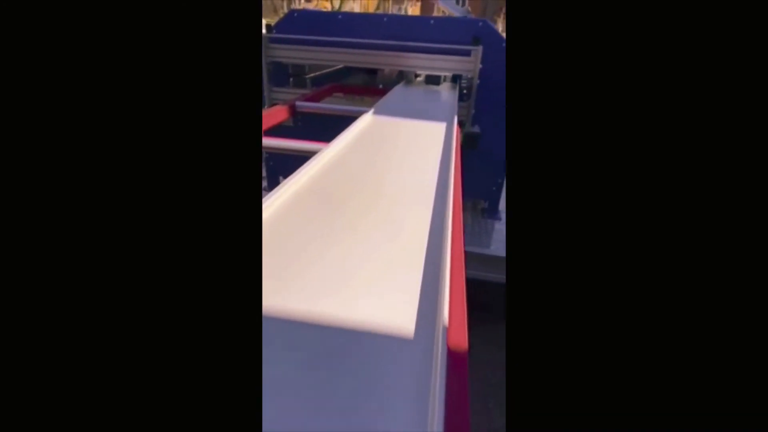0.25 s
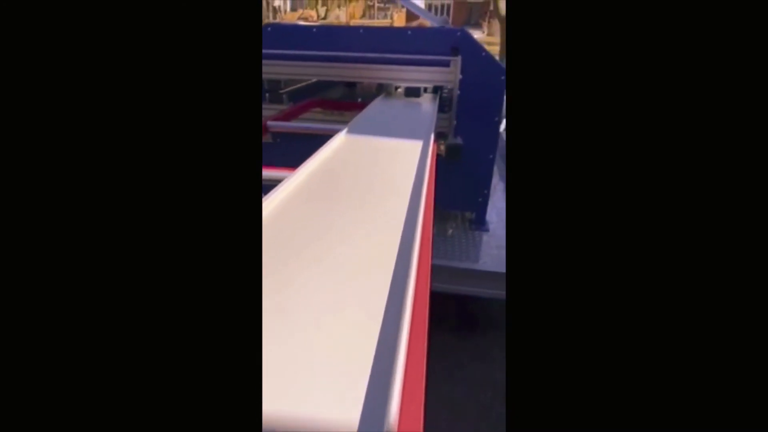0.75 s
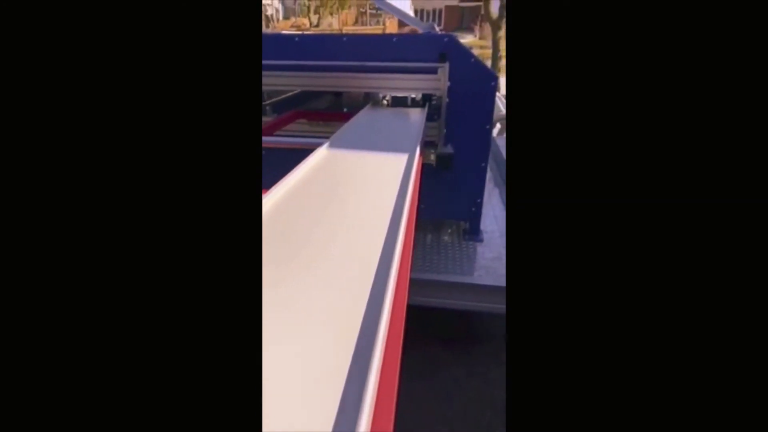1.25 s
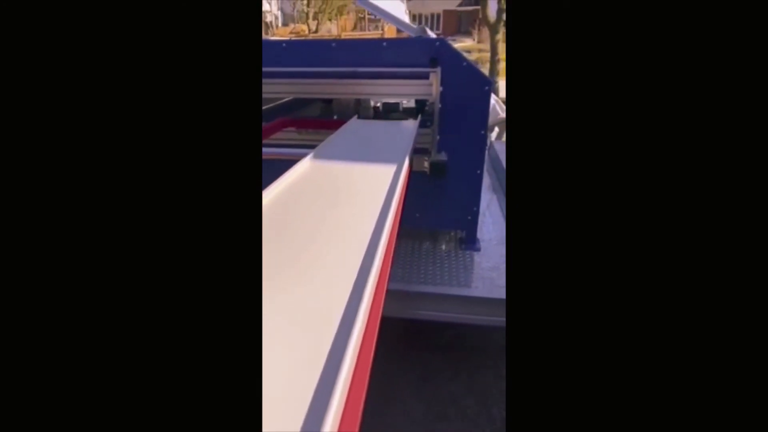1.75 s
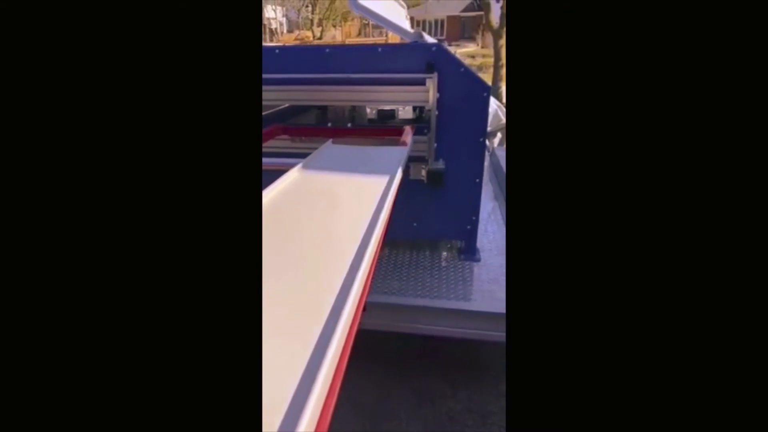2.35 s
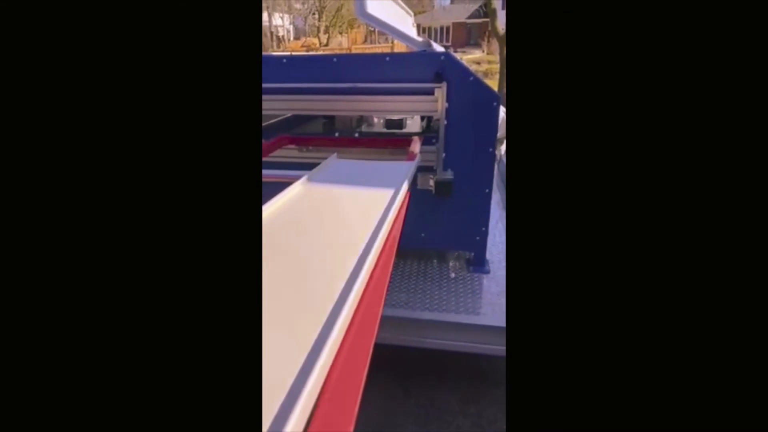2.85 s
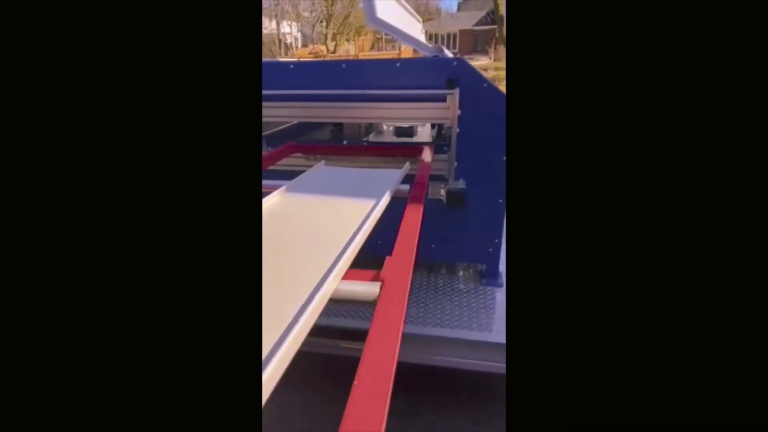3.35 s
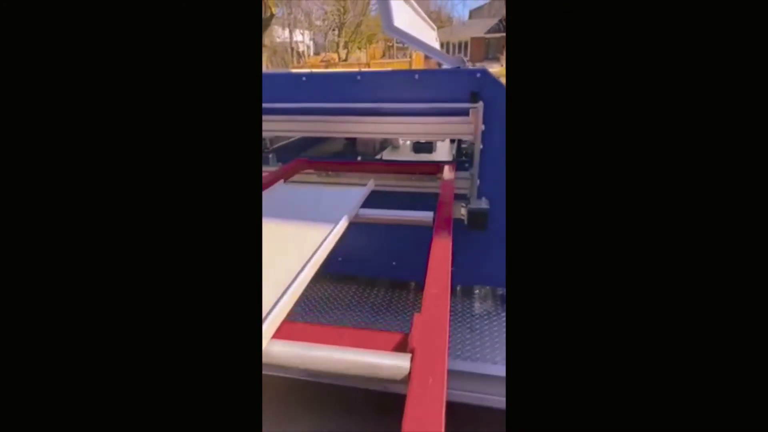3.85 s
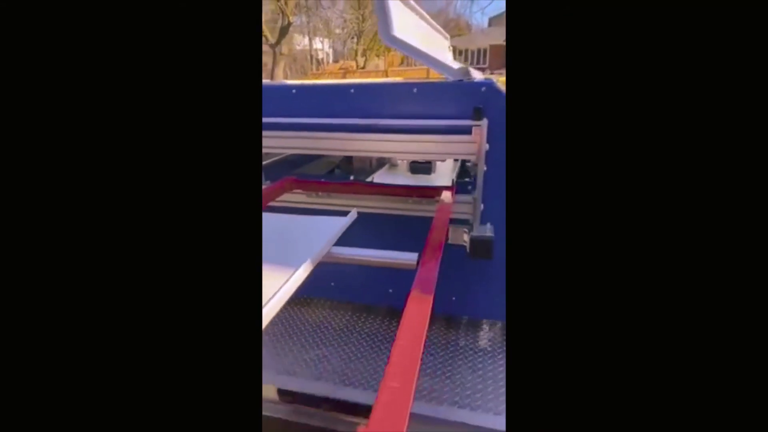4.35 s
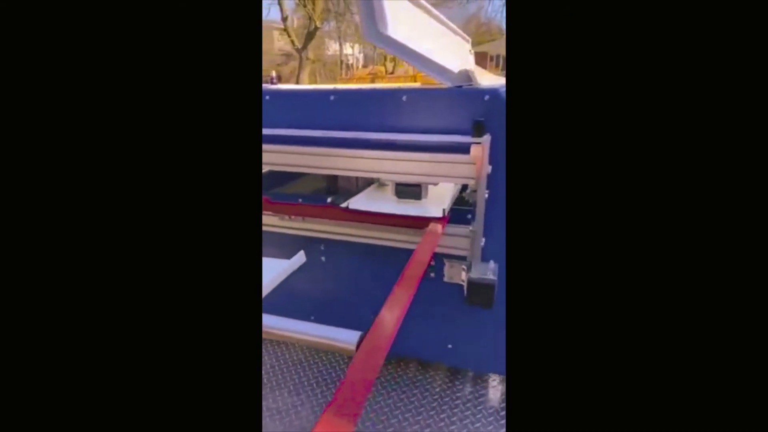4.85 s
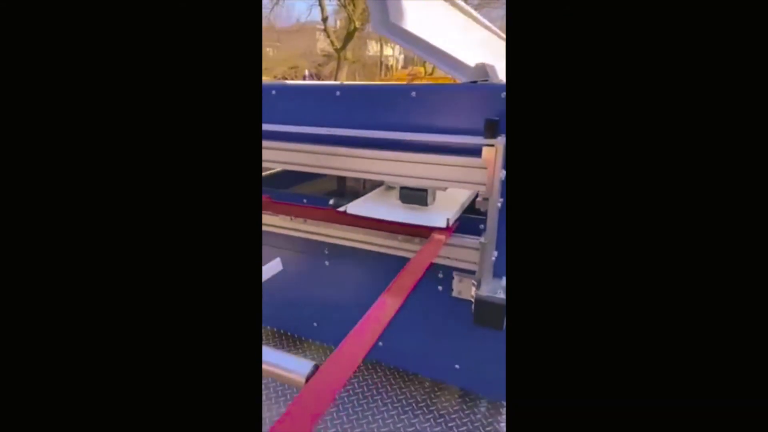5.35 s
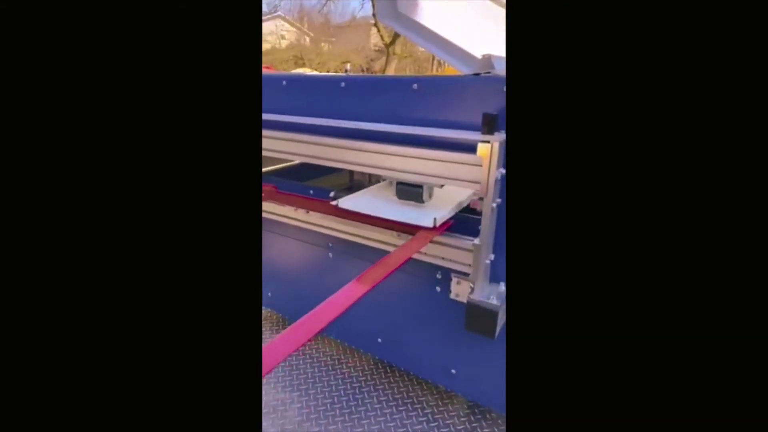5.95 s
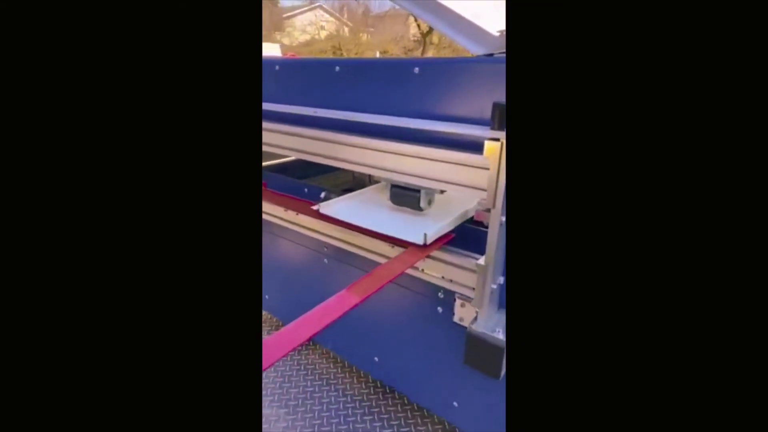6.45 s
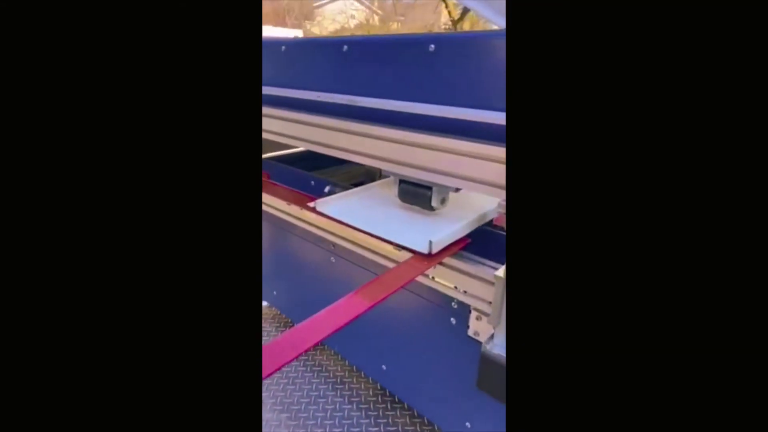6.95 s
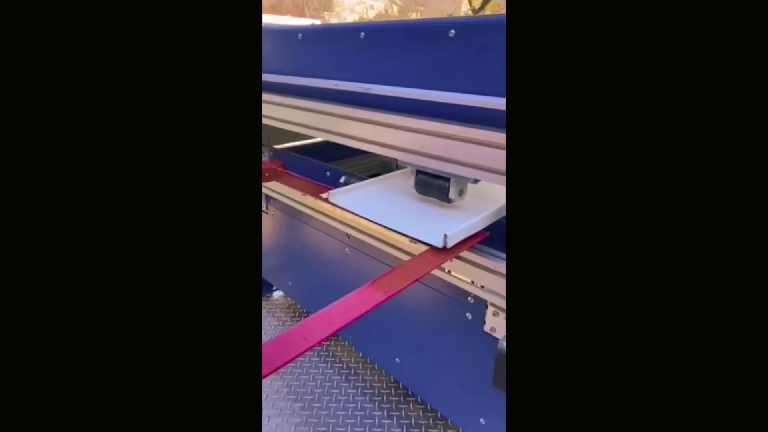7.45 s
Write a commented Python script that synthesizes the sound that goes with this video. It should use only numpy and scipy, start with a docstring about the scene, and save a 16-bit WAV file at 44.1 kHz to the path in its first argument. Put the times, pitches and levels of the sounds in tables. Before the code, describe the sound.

A thin steel roof panel leaves a forming machine outdoors, booming softly, rumbling and knocking over rollers while its edge scrapes and clanks on a rail. The drive's low hum stops after about three seconds. A sharp double snap, a dull bump and a few more clanks follow as the sheet drops away. Only light slides and taps remain over a faint outdoor rumble, heard from close by.

```python
"""Steel roof panel on a roller table

A thin sheet leaves a roll-forming machine outdoors, over the low hum of the drive. Flexure makes it
boom, rolling contact makes it rumble, and friction on the rail makes it scrape. Impacts excite
decaying modes: it knocks on the rollers and clanks on the frame as its end drops off them.
Then only a few light slides and taps are left over a faint outdoor rumble."""
import sys
import numpy as np
from scipy import signal
from scipy.fft import rfft, irfft, next_fast_len
from scipy.io import wavfile
from scipy.ndimage import map_coordinates

SR = 44100
rng = np.random.default_rng(int(sys.argv[2]) if len(sys.argv) > 2 else 0)


def transcribe(u):
    """Save the signal u as a 16-bit wav file named by the first command-line argument.

    u: samples, shape (n,) or (channels, n), limited to [-1, 1]; the rate is SR.
    q: integer samples, one column per channel.
    """
    v = np.clip(np.atleast_2d(u).T, -1, 1)
    q = np.round(v * 32767).astype(np.int16)
    wavfile.write(sys.argv[1], SR, q)


N = 339127
TIME = np.arange(N) / SR
BLOW_SAMPLES = SR // 2
CUTOFF_HZ = 16200
SHARED_ONLY = [[1], [0]]  # row 0: sound common to both microphone ports; row 1: diffuse sound


def from_db(db):
    """Amplitude ratio of a level in decibels."""
    return np.exp(np.asarray(db) * (np.log(10) / 20))


def unit_rms(x):
    """Normalisation to unit power."""
    return x / np.sqrt(np.mean(x ** 2) + 1e-20)


def gains(rows):
    """One amplitude envelope for each level column of a time table."""
    times, *columns = np.transpose(rows)
    return [from_db(np.interp(TIME, times, levels)) for levels in columns]


def at_hz(points, hz):
    """Interpolation on a logarithmic frequency axis."""
    known, values = np.transpose(points)
    return np.interp(np.log(np.maximum(hz, 1)), np.log(known), values)


def swell(start, end, attack, release):
    """Exponential growth and decay: full from start to end, 20 dB down one attack or release away."""
    before = np.maximum(start - TIME, 0) / attack
    after = np.maximum(TIME - end, 0) / release
    return from_db(-20 * (before + after))


def decay(t60):
    """Damped free vibration: the envelope falls 60 dB in t60 seconds."""
    return np.exp(-np.log(1000) * TIME[:BLOW_SAMPLES] / t60)


def drift(rate):
    """Random modulation of unit rms, with `rate` new values a second."""
    knots = rng.standard_normal(4096)
    return unit_rms(np.interp(TIME * rate, np.arange(len(knots)), knots))


def phase(hz):
    """Phase in radians, the time integral of frequency."""
    return 2 * np.pi * np.cumsum(hz) / SR


def noise(size=N):
    """Two uncorrelated white noises, shared and diffuse."""
    return rng.standard_normal((2, size))


def contacts(per_s, spread_db):
    """Shot noise: tiny contacts of uneven strength at random moments."""
    sizes = from_db(spread_db * np.minimum(rng.exponential(1, N), 5))
    return unit_rms(noise() * sizes * (rng.random(N) < per_s / SR))


def colour(x, spectrum, modes=()):
    """Source-filter model: x shaped by a broad spectrum and Lorentzian resonances, at unit rms."""
    size = next_fast_len(x.shape[-1])
    hz = np.fft.rfftfreq(size, 1 / SR)
    peaks = 1 + sum((from_db(db) ** 2 - 1) / (1 + (2 * (hz - f) / width) ** 2) for f, width, db in modes)
    gain = from_db(at_hz(spectrum, hz)) * np.sqrt(np.abs(peaks))
    return unit_rms(irfft(rfft(x, size) * gain, size)[..., :x.shape[-1]])


def partials(pitches, levels_db=0):
    """Superposition of sinusoids in random phase, at unit rms."""
    cycles = np.outer(pitches, TIME[:BLOW_SAMPLES]) + rng.random((len(pitches), 1))
    return unit_rms((from_db(levels_db) * np.sin(2 * np.pi * cycles).T).sum(1)) * SHARED_ONLY


def struck(modes, spread_db=3.5):
    """Modal excitation: each blow shares its force differently among the modes."""
    hz, _, db = np.transpose(modes)
    return partials(hz, db + spread_db * rng.standard_normal(len(hz)))


def add(out, t, sound):
    """Superpose a sound on `out` from time t."""
    at = max(round(t * SR), 0)
    out[:, at:at + sound.shape[1]] += sound[:, :N - at]


def sheet_ring(x, t60, ring_db, block=6000):
    """Plate reverberation: contacts ring on in dense modes, which change as the sheet travels."""
    ringing = np.zeros((2, N))
    for at in range(0, N, block):
        response = noise(2 * block) * decay(t60)[:2 * block]
        add(ringing, at / SR, signal.fftconvolve(x[:, at:at + block], response, axes=1))
    return x + from_db(ring_db) * unit_rms(ringing)


def bend(x, depth, rate):
    """Frequency modulation: all resonances drift by the fraction `depth` as the sheet bends."""
    at = np.arange(N) + np.cumsum(depth * drift(rate))
    return np.array([map_coordinates(row, [at], order=3, mode="reflect") for row in x])


# spectrum of the outdoor rumble: f/Hz, gain/dB
AIR_SPECTRUM = [(20, -19.5), (35, -7), (48, 0), (90, 3), (130, -5), (180, -11.5), (260, -13.5), (500, -21),
                (1000, -28), (2000, -33.5), (5000, -39), (10000, -44.5), (13000, -48), (16000, -54)]
# faint hum within it: f/Hz, bandwidth/Hz, gain/dB
AIR_PEAK = [(617, 14, 8.5)]


def outdoors():
    """Ambient noise: a fluctuating low rumble with a thin hiss above it."""
    return from_db(-50) * colour(noise(), AIR_SPECTRUM, AIR_PEAK) * from_db(drift(36))


# swells of a distant drone: t/s, level/dB
DRONE_SWELLS = [(4.649, -52), (7.15, -57)]


def drone(first_swell_hz=191.4, sag_hz_per_s=8.7, fade_s=1.1):
    """A modulated tone: it wavers in level and frequency while its pitch slowly sinks."""
    hz = first_swell_hz - sag_hz_per_s * (TIME - DRONE_SWELLS[0][0])
    envelope = sum(from_db(db) * swell(t, t, fade_s, fade_s) for t, db in DRONE_SWELLS)
    tone = np.sin(phase(hz * (1 + 0.024 * drift(30))))
    return np.sqrt(2) * envelope * from_db(1.8 * drift(13)) * tone * SHARED_ONLY


IDLER_START_S = 2.96


def whine():
    """Narrow-band noise: a thin, very high whine while the idler roller spins."""
    band = colour(noise(), [(14800, -40), (15500, 0), (15850, 0), (16200, -40)], [(15680, 260, 10)])
    return from_db(-56.5) * band * swell(IDLER_START_S, 4.16, attack=0.18, release=0.18)


def idler(hz=47.3):
    """Rotational tone: an idler roller spins freely with a deep drone, then stops."""
    envelope = from_db(-44) * swell(IDLER_START_S, 4.4, attack=0.5, release=0.24)
    return np.sqrt(2) * envelope * np.sin(phase(hz * (1 + 0.022 * drift(2.7)))) * SHARED_ONLY


# drive hum: t/s, then level/dB of harmonics 1, 2 and 5
HUM_HARMONICS = [(0.4, -50, -36, -35.5), (0.5, -33.5, -29, -37), (0.76, -28.5, -38, -37),
                 (0.93, -31.5, -29.5, -43), (1.1, -31, -32, -51), (1.44, -38, -25.5, -29),
                 (1.62, -32.5, -33, -48), (1.98, -32.5, -43, -42), (2.2, -48, -58, -34.5),
                 (2.39, -57, -32, -71), (2.49, -30, -38.5, -45), (3.05, -32, -35, -51.5)]


def drive_hum(hz=73.94, waver=0.005):
    """Periodic vibration: the drive sounds three harmonics of a slightly unsteady fundamental."""
    first, second, fifth = gains(HUM_HARMONICS)
    angle = phase(hz * (1 + waver * drift(8)))
    tone = first * np.sin(angle) + second * np.sin(2 * angle) + fifth * np.sin(5 * angle)
    return np.sqrt(2) * tone * swell(0.42, 2.97, attack=0.19, release=0.24) * SHARED_ONLY


# touches of loose metal: t/s, relative level/dB, f/Hz, T60/s
LIGHT_TAPS = [(4.771, -52.5, 1490, 0.24), (5.533, -46, 3300, 0.19), (5.546, -51, 2920, 0.23),
              (5.858, -57, 1100, 0.18), (5.879, -49.5, 2100, 0.23), (5.956, -46.5, 2510, 0.33),
              (6.710, -52.5, 2400, 0.14), (6.798, -57, 1505, .12), (7.050, -57, 9650, .12),
              (7.109, -55.5, 1520, .18), (7.338, -53, 10420, .11), (7.49, -47, 1820, 0.1),
              (7.494, -50, 3180, .07)]
# spectrum of a tap: f/Hz, gain/dB
TAP_SPECTRUM = [(400, -14), (1600, 1), (4500, -5.5), (11000, -10), (16000, -26)]


def taps(level_db=-5, relative_width=0.26, overtone_ratio=1.6, tick_t60=0.026, rise_s=0.0087):
    """Light impacts: a soft tick, then the damped ring of one broad resonance and two partials."""
    out = np.zeros((2, N))
    for t, db, hz, t60 in LIGHT_TAPS:
        resonance = colour(noise(BLOW_SAMPLES), TAP_SPECTRUM, [(hz, relative_width * hz, 11)])
        ring = from_db(-10) * partials([hz, min(hz * overtone_ratio, CUTOFF_HZ)])
        envelope = (decay(t60) + decay(tick_t60)) * (1 - decay(rise_s))
        add(out, t, from_db(db + level_db) * (resonance + ring) * envelope)
    return out


# late slides: start/s, end/s, attack/s, release/s, relative level/dB, resonant share of power (0-1)
LIGHT_SLIDES = [(5.188, 5.257, 0.049, 0.19, -50.5, 0.06), (5.37, 5.397, 0.11, 0.52, -59.5, 0.16),
                (5.985, 6.064, 0.06, 0.17, -56, 0.84), (6.104, 6.207, 0.044, 0.15, -46.5, 0.55),
                (6.212, 6.218, 0.082, 0.045, -43, 0.96), (7.45, 7.47, 0.06, 0.2, -64, 0.13)]
# spectrum of sliding: f/Hz, gain/dB
SLIDE_SPECTRUM = [(150, -4), (350, 1), (800, 3.5), (1500, -2), (2400, 1.5), (4600, -1.5), (6000, -2.5),
                  (10000, -6.5), (13000, -8), (16000, -26)]
# modes excited by firm sliding: f/Hz, bandwidth/Hz, gain/dB
SLIDE_RESONANCES = [(985, 67, 10), (1277, 21, 13), (1993, 39, 10), (2910, 44, 23.5), (3020, 100, 7),
                    (3530, 30, 12), (4000, 45, 16.5), (4120, 72, 16.5), (4435, 46, 17), (4980, 120, 11),
                    (5430, 60, 12)]


def slides(level_db=1):
    """Sliding friction: light rubbing is a plain hiss; firmer rubbing excites the sheet's modes."""
    friction = sheet_ring(contacts(per_s=1500, spread_db=2.5), t60=0.13, ring_db=6)
    friction *= from_db(0.97 * drift(70))
    singing = bend(colour(friction, SLIDE_SPECTRUM, SLIDE_RESONANCES), depth=0.004, rate=30)
    hiss = colour(friction, SLIDE_SPECTRUM)
    out = np.zeros((2, N))
    for start, end, attack, release, db, share in LIGHT_SLIDES:
        blend = np.sqrt(share) * singing + np.sqrt(1 - share) * hiss
        out += from_db(db + level_db) * swell(start, end, attack, release) * blend
    return out


# the sheet flexes or settles: t/s, relative level/dB, T60/s
DULL_BUMPS = [(3.385, -24.5, 0.96), (4.45, -39, 0.46), (5.831, -50, 0.46), (6.104, -36, 0.11),
              (7.455, -46, 0.14)]
# spectrum of a bump: f/Hz, gain/dB
BUMP_SPECTRUM = [(120, -11.5), (240, -7.5), (360, -3), (600, -11.5), (1000, -18), (2500, -56)]


def bumps(level_db=-3, rise_s=0.19):
    """Soft impacts: a slow contact excites only the low modes of the sheet."""
    out = np.zeros((2, N))
    for t, db, t60 in DULL_BUMPS:
        thud = colour(noise(BLOW_SAMPLES), BUMP_SPECTRUM)
        add(out, t, from_db(db + level_db) * thud * decay(t60) * (1 - decay(rise_s)))
    return out


# the edge bites harder: start/s, end/s, level/dB, resonance f/Hz
EDGE_BITES = [(2.036, 2.182, -33, 5100), (3.307, 3.407, -38, 4640), (3.537, 3.658, -42, 5200)]
# spectrum of a rasp: f/Hz, gain/dB
RASP_SPECTRUM = [(2500, -38), (4000, 0), (4600, -7), (5000, -4), (5400, -1.5), (6300, -6), (8000, -22)]


def rasps(width_hz=190, resonance_db=7.5):
    """Coarse friction: each bite of the edge excites one resonance of the rail."""
    teeth = sheet_ring(contacts(per_s=4000, spread_db=7), t60=0.36, ring_db=9.5)
    out = np.zeros((2, N))
    for start, end, db, hz in EDGE_BITES:
        rasp = colour(teeth, RASP_SPECTRUM, [(hz, width_hz, resonance_db)])
        out += from_db(db) * swell(start, end, attack=0.068, release=0.11) * rasp
    return out


# low modes that sing out: start/s, end/s, level/dB, f/Hz
SINGING_MODES = [(0.0, 0.041, -25.5, 584.4), (0.031, 0.164, -28, 645), (0.965, 1.11, -29.5, 212),
                 (1.885, 1.97, -27.5, 92), (1.92, 2, -32.5, 439), (2.14, 2.193, -32, 633),
                 (2.163, 2.295, -29.5, 100.6)]


def groans(fade_s=0.089, waver=0.0118):
    """Friction-driven resonance: single low modes of the dragged sheet build up and sing briefly."""
    angle_per_hz = phase(1 + waver * drift(26))
    tones = sum(from_db(db) * swell(start, end, fade_s, fade_s) * np.sin(hz * angle_per_hz)
                for start, end, db, hz in SINGING_MODES)
    return np.sqrt(2) * tones * SHARED_ONLY


# snaps of the edge: t/s, level/dB, standard deviation of the pulse/s
EDGE_SNAPS = [(3.1843, -12.5, 0.00084), (3.216, -17, 0.0011), (3.221, -27.5, 0.0013)]


def snaps(tail_db=-23, tail_t60=0.28):
    """Impulsive transients: a Gaussian pulse of very bright noise with a short, weak ring."""
    spectrum = [(2000, -20), (5800, -5), (8000, 8), (12000, -9.5), (16000, 2)]
    out = np.zeros((2, N))
    for t, db, width in EDGE_SNAPS:
        crack = colour(noise(BLOW_SAMPLES), spectrum)
        pulse = np.exp(-((TIME[:BLOW_SAMPLES] / width - 2) ** 2) / 2)
        add(out, t - 2 * width, from_db(db) * crack * (pulse + from_db(tail_db) * decay(tail_t60)))
    return out


# edge hits frame: t/s, relative level/dB, gain above 8 kHz/dB, mode cluster f/Hz, cluster gain/dB
FRAME_HITS = [(0.033, -17, -4, 5660, 10.5), (0.1466, -29, 4, 4500, 0), (0.2768, -23, -2, 4500, -4),
              (0.4278, -28, 0, 3200, -5), (0.503, -31, -1, 3140, 13), (0.7918, -28, 6, 5000, 2),
              (0.889, -33, -4, 5300, 0), (0.973, -36.5, 7, 5200, 6), (1.133, -26, -3, 4000, 8),
              (1.154, -25.5, 18, 5000, -3), (1.18, -28, -14, 4200, 16.5), (1.3218, -24, 1, 3200, -1),
              (1.386, -42, 1, 2400, 4), (2.2324, -15.5, -5, 5100, -1), (2.306, -23, -0.5, 4600, 4),
              (2.7627, -27.5, 4, 5000, -3), (3.844, -22, 6.5, 5100, 1.5), (4.156, -10.5, 0, 5180, 5.5),
              (4.5894, -23.5, 1.5, 2370, 3)]
# spectrum of a clank: f/Hz, gain/dB
CLANK_SPECTRUM = [(300, -23), (800, -4.5), (1600, -8.5), (2300, -1), (4500, 2), (6500, 3), (9000, -2.5),
                  (12500, -5.5), (15600, -11.5), (16500, -29.5)]
# high modes of the struck edge: f/Hz, bandwidth/Hz, gain/dB
EDGE_MODES = [(2097, 47, 3.5), (3105, 35, 6.5), (3920, 36, 2), (4440, 40, 6.5), (4555, 29, 4.5),
              (4750, 55, 4), (4900, 25, 5.5), (5185, 45, 3.5), (5420, 50, 5.5), (5680, 35, 4),
              (5970, 50, 3.5)]


def clanks(level_db=-6, rise_s=0.014, cluster_width_hz=300):
    """Hard impacts excite all the high modes at once; the point of contact weights one cluster."""
    strike = from_db(-0.5) * decay(t60=0.027)
    shimmer = from_db(-19) * decay(t60=0.47)
    envelope = strike + decay(t60=0.22) + shimmer
    out = np.zeros((2, N))
    for t, db, treble_db, cluster_hz, cluster_db in FRAME_HITS:
        spectrum = [(hz, gain + treble_db * (hz > 8000)) for hz, gain in CLANK_SPECTRUM]
        modes = EDGE_MODES + [(cluster_hz, cluster_width_hz, cluster_db)]
        crash = colour(noise(BLOW_SAMPLES), spectrum, modes) * envelope
        ring = from_db(-4) * struck(EDGE_MODES) * decay(t60=0.2)
        add(out, t, from_db(db + level_db) * (crash + ring) * (1 - decay(rise_s)))
    return out


# sheet hits roller: t/s, relative level/dB, f/Hz, bandwidth/Hz, low-mode gain/dB, overtone gain/dB
ROLLER_HITS = [(0.005, -10.5, 1240, 200, -14, -20.5), (0.026, -16, 628, 109, -7, -19.5),
               (0.077, -12, 1270, 120, -13, -20), (0.150, -15.5, 1276, 110, -2, -20),
               (0.429, -19, 613, 150, -16.5, -15), (0.801, -14.5, 990, 300, -16, -13),
               (1.324, -16.5, 710, 90, -11, -13), (1.386, -16, 616, 120, -9, -25),
               (1.774, -14, 965, 260, -11.5, -22.5), (2.308, -12, 722, 110, -17, -14.5),
               (2.772, -12, 1007, 330, -8, -16), (3.844, -31, 863, 80, -7.5, -13),
               (4.16, -25.5, 855, 100, -2.5, -14.5), (4.591, -17, 803, 95, -7, -10),
               (6.119, -46, 704, 400, -19, -12)]
# spectrum of a knock: f/Hz, gain/dB
KNOCK_SPECTRUM = [(300, -2), (600, -2.5), (750, 5.5), (1080, -1), (1400, -4.5), (2000, -12.5),
                  (3500, -19.5), (6000, -22.5), (12000, -44)]
# overtones of a hollow roller: f/Hz, bandwidth/Hz, gain/dB
ROLLER_OVERTONES = [(2330, 73, 18.5), (2520, 90, 18.5), (2840, 24, 18), (3155, 36, 15), (3960, 36, 20.5),
                    (4340, 44, 17.5), (4530, 36, 18), (4690, 70, 19.5), (5700, 50, 16.5), (6312, 50, 21)]


def knocks(level_db=-7, resonance_db=13, rise_s=0.0099):
    """Blunt impacts ring a roller; the point of contact selects three close low modes."""
    out = np.zeros((2, N))
    for t, db, hz, width_hz, low_db, overtone_db in ROLLER_HITS:
        modes = [(hz, width_hz, resonance_db)] + ROLLER_OVERTONES
        crack = colour(noise(BLOW_SAMPLES), KNOCK_SPECTRUM, modes)
        crack *= from_db([[1], [-4]])  # a near, small source: more shared than diffuse sound
        low_ring = from_db(low_db) * partials([0.91 * hz, hz, 1.06 * hz])
        overtones = from_db(overtone_db) * struck(ROLLER_OVERTONES)
        knock = crack * decay(t60=0.21) + (low_ring + overtones) * decay(t60=0.22)
        add(out, t, from_db(db + level_db) * knock * (1 - decay(rise_s)))
    return out


# the panel travels off over the rollers: t/s, relative level/dB of boom and of rolling
PANEL_TRAVEL = [(0.0, -24.5, -22), (0.13, -25, -33), (0.3, -37.5, -37), (0.48, -31.5, -32),
                (0.8, -31.5, -32.5), (1.35, -23.5, -27), (1.62, -29, -34.5), (2.75, -26.5, -33),
                (3.02, -35, -47.5), (4.15, -35, -48), (4.72, -42, -54.5), (5.0, -43.5, -56.5)]
# edge presses on rail: start/s, end/s, attack/s, release/s, relative level/dB of roll, scrape, sizzle
RAIL_RUBS = [(0.0, 0.048, 0.061, 0.47, -19.5, -25, -25.5), (0.462, 0.533, 0.23, 0.13, -35, -41.5, -67),
             (1.075, 1.195, 0.16, 0.16, -29, -35, -44), (1.772, 1.81, 0.28, 0.82, -25, -33.5, -34.5),
             (1.96, 2.15, 0.34, 0.45, -29.5, -33.5, -33.5), (2.604, 2.678, 0.1, 0.12, -33, -51, -60),
             (2.75, 3.02, 0.8, 0.48, -52, -41.5, -44.5), (3.318, 3.452, 0.26, 0.32, -43, -39, -35),
             (3.517, 3.619, 0.36, 0.27, -51.5, -45.5, -40.5)]
# spectra of flexure, rolling, scraping and the sizzle of the edge: f/Hz, gain/dB
BOOM_SPECTRUM = [(20, -22.5), (36, -19.5), (55, -7), (75, 3.5), (100, -1), (135, 4), (180, -11), (260, -8),
                 (500, -52)]
ROLL_SPECTRUM = [(110, -13), (210, 1), (300, 1.5), (450, -4), (750, -5), (1100, -11), (1450, -15),
                 (2200, -16.5), (5000, -48)]
SCRAPE_SPECTRUM = [(600, -16.5), (1400, 5), (2000, 5), (3200, 5.5), (5200, 3), (6500, -3.5), (8000, -15.5),
                   (11000, -21), (16000, -39)]
SIZZLE_SPECTRUM = [(4000, -28.5), (6500, 5.5), (8300, 5), (10500, 3.5), (13000, 2), (14800, -9.5),
                   (15600, -5.5), (16300, -34)]
# modes of the sheet, rolling and scraping: f/Hz, bandwidth/Hz, gain/dB
ROLL_RESONANCES = [(202.5, 20, 4), (372.5, 21, 5), (446, 10, 8), (546.5, 48, 6.5), (620, 19, 8.5),
                   (845, 54, 6.5), (1048, 50, 7), (1230, 64, 10), (1600, 76, 8.5)]
SCRAPE_RESONANCES = [(2050, 120, 3), (2930, 170, 2.5), (4540, 200, 0.64), (5000, 39, 4.6), (5440, 120, 1.2)]


def panel(sizzle_exponent=2.13, end_s=5.52):
    """Forced vibration of a thin plate: it booms in flexure, rattles on rollers, scrapes on the rail."""
    boom, roll = gains(PANEL_TRAVEL)
    scrape, sizzle = from_db(-15.5) * roll, from_db(-24.5) * roll  # the edge always brushes the rail
    for start, end, attack, release, roll_db, scrape_db, sizzle_db in RAIL_RUBS:
        pressure = swell(start, end, attack, release)
        roll = np.hypot(roll, from_db(roll_db) * pressure)  # incoherent sounds add in power
        scrape = np.hypot(scrape, from_db(scrape_db) * pressure)
        sizzle = np.hypot(sizzle, from_db(sizzle_db) * pressure ** sizzle_exponent)
    flexing = from_db(-1) * boom * colour(noise(), BOOM_SPECTRUM)
    rattle = contacts(per_s=4200, spread_db=0.5) * from_db(drift(35))
    rolling = from_db(2) * roll * colour(rattle, ROLL_SPECTRUM, ROLL_RESONANCES)
    friction = sheet_ring(contacts(per_s=3500, spread_db=0.5), t60=0.086, ring_db=2)
    friction *= from_db(1.9 * drift(30))
    scraping = from_db(3) * scrape * colour(friction, SCRAPE_SPECTRUM, SCRAPE_RESONANCES)
    sizzling = from_db(0.5) * sizzle * colour(friction, SIZZLE_SPECTRUM) * from_db(1.9 * drift(24))
    fade_out = np.clip(end_s - TIME, 0, 1)
    return (flexing + rolling + scraping + sizzling) * fade_out


# likeness of the two microphone ports: f/Hz, coherence (0-1)
PORT_COHERENCE = [(80, 1), (220, 0.94), (400, 0.72), (700, 0.43), (2500, 0.42), (6000, 0.69), (7200, 1),
                  (7800, 0.96), (9000, 0.54), (10300, 0.86), (11100, 0.66), (12200, 0.84), (13400, 1),
                  (15200, .55)]
# lead of the left port: f/Hz, phase/rad
PORT_LEAD = [(100, 0), (600, -.15), (1800, .05), (2700, 1.2), (5500, 1.1), (6900, 3.05), (7800, 3.25),
             (9800, 6.2), (11200, 6.35), (13000, 9.35), (14300, 9.5), (15200, 12.4)]


def ports(x):
    """Spatial coherence: two close ports hear the bass alike; higher up, likeness and phase part."""
    size = next_fast_len(N + SR // 10)
    hz = np.fft.rfftfreq(size, 1 / SR)
    shared, diffuse = rfft(x, size)
    coherence = np.clip(at_hz(PORT_COHERENCE, hz), 0, 0.995)
    shared *= np.sqrt((1 + coherence) / 2)
    diffuse *= np.sqrt((1 - coherence) / 2)
    lean_db = at_hz([(60, -1.2), (150, 0.6), (300, 1.5), (600, -0.32), (4000, 0.67)], hz)
    skew = from_db(lean_db / 2) * np.exp(1j * at_hz(PORT_LEAD, hz) / 2)
    left, right = (shared + diffuse) * skew, (shared - diffuse) / skew
    return irfft(np.array([left, right]), size)[:, :N]


# balance as the microphone turns: t/s, left minus right level/dB
BALANCE = [(0, 0), (4.2, -.2), (4.6, -2.8), (5.2, -.7), (7.69, -.7)]


def scene():
    """Linear superposition of all sources at a slightly turning microphone."""
    impacts = knocks() + bumps() + clanks() + snaps() + taps()
    running = panel() + rasps() + groans() + drive_hum() + idler() + whine()
    heard = ports(running + slides() + impacts + outdoors() + drone())
    lean = np.sqrt(gains(BALANCE)[0])
    return heard * np.array([lean, 1 / lean])


def record(dry):
    """Soft saturation rounds the highest peaks; a steep low-pass filter cuts the top."""
    rounded = 1.3 * np.tanh(dry / 1.3)
    low_pass = signal.cheby2(16, 70, CUTOFF_HZ + 700, fs=SR, output="sos")
    return signal.sosfilt(low_pass, rounded)


dry = scene()
out = record(dry)
transcribe(out)
```